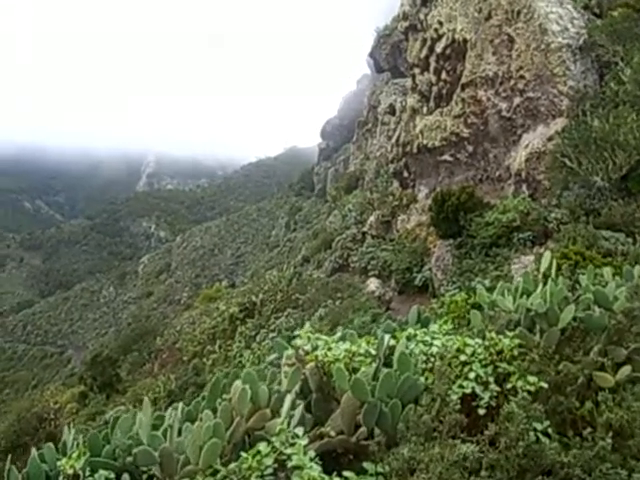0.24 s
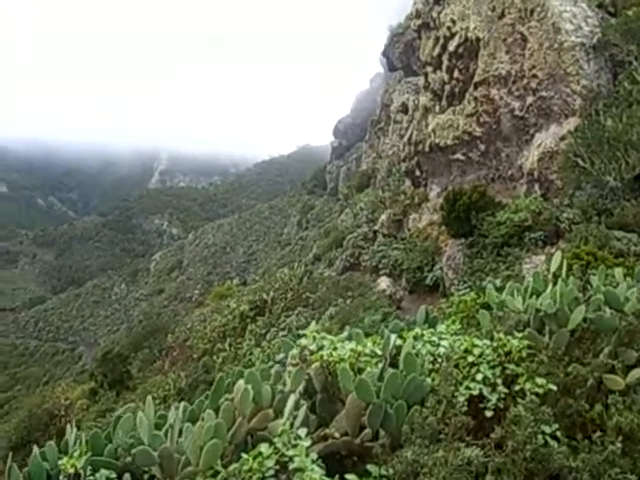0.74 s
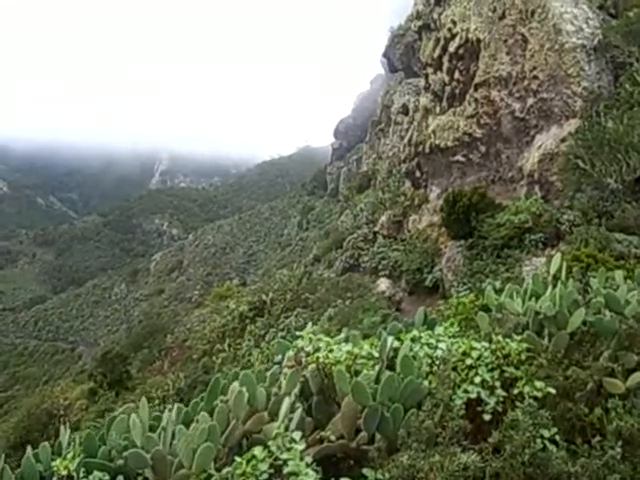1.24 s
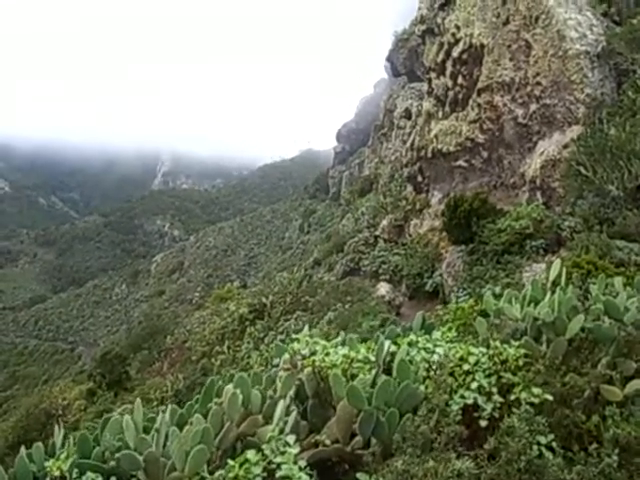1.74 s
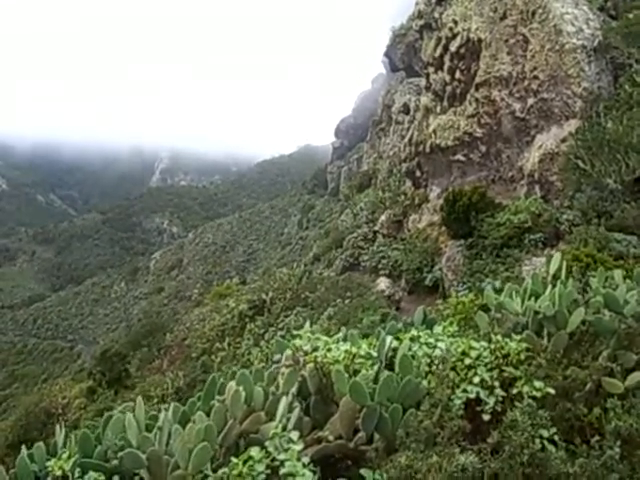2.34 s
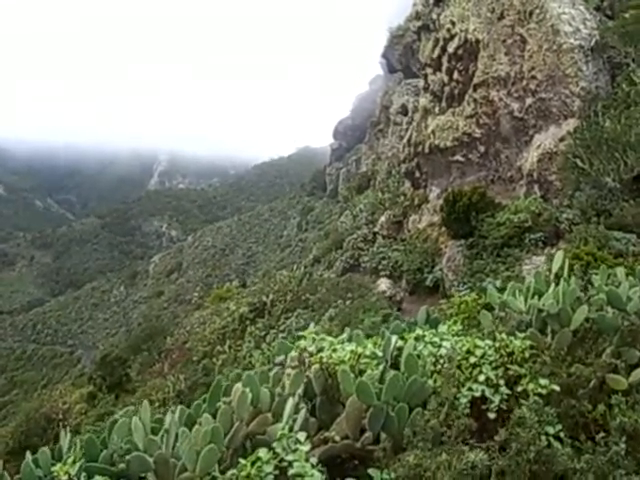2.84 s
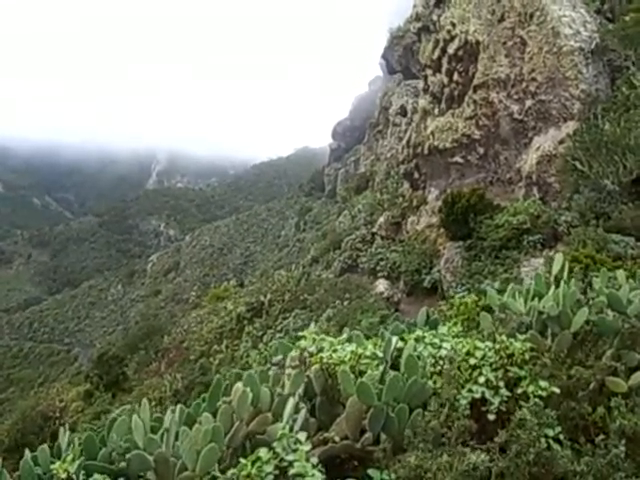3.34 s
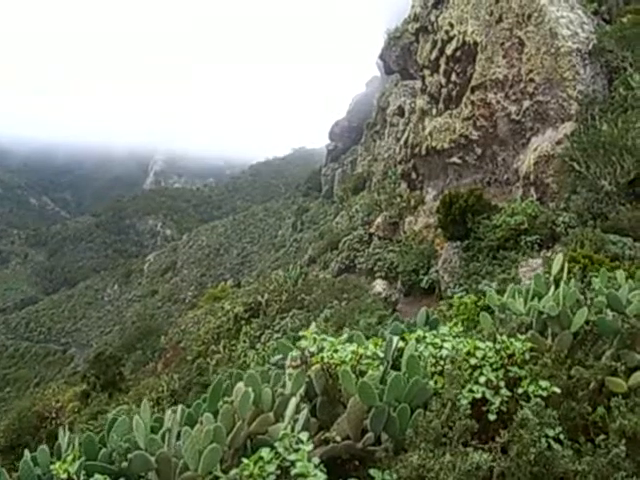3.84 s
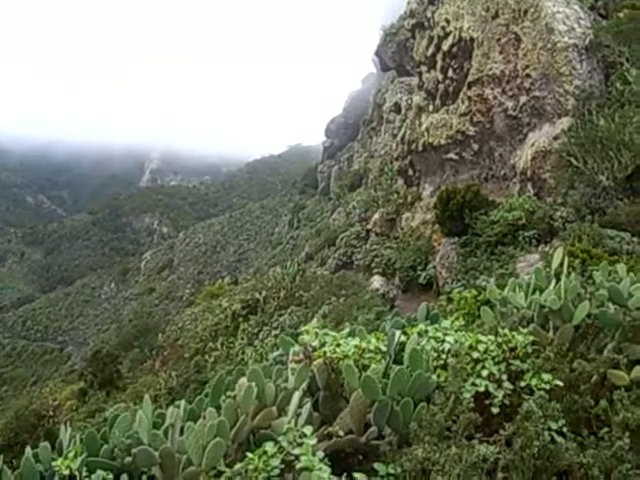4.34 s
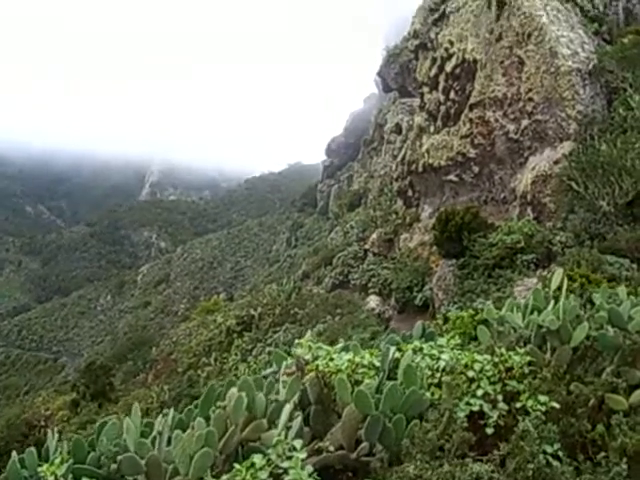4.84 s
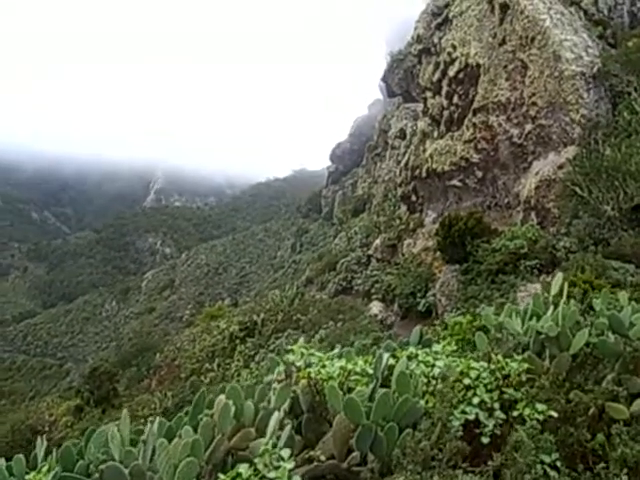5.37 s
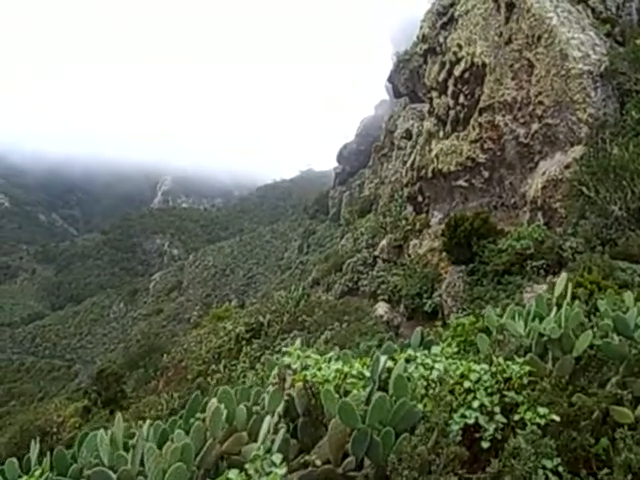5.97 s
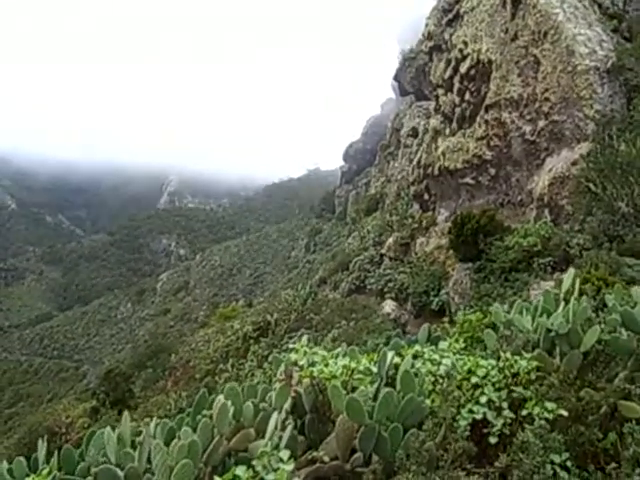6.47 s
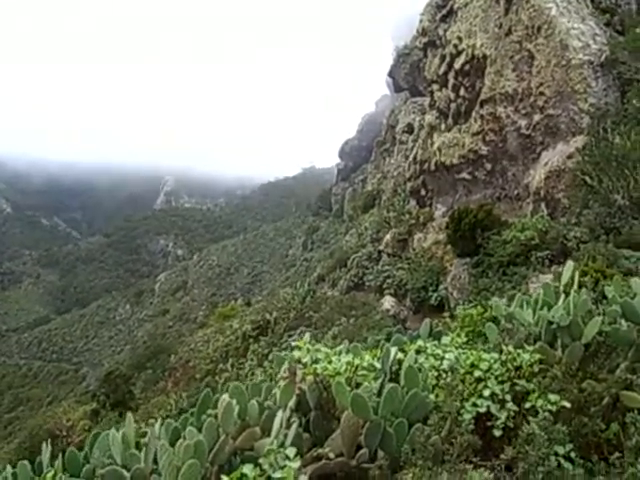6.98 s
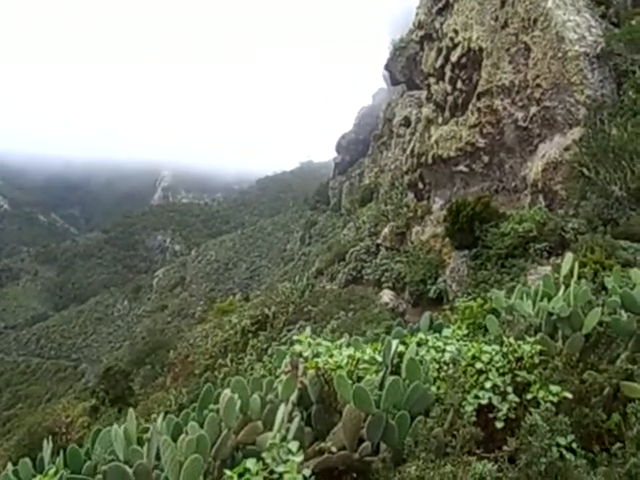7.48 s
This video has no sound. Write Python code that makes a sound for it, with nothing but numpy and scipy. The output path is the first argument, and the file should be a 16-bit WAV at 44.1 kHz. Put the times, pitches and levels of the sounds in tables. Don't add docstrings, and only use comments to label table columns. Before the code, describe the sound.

A steady soft hiss with low rumble, faint hum and very thin high whine runs throughout, as from a small handheld camera outdoors. Barely audible birds twitter far down the slope. At about 1.1 seconds a small near bird begins: three sharp whistles, each about a tenth of a second, sweeping from very high to middling high, the first weaker. From 1.9 to 2.6 it continues with lower, softer warbles, dips and lifts, with short echoes from leaves and rock. Light ticks and strap rustle occur around 2.2. From 3.2 mild wind flutters while distant twitters thicken around 4 to 4.8. Near 5.6 a very thin high note starts the second phrase; a heavy low wind thump hits at 5.75; another high note follows at 5.9, then a lower scoop at 6.1 and four short rising chirps until 6.75. Dull plastic knocks and rustling cluster around 6.8 to 7.0, then faint calls and hiss to the end.

```python
import sys
import numpy as np
from scipy import signal
from scipy.fft import rfft, irfft, next_fast_len
from scipy.io import wavfile
from scipy.ndimage import uniform_filter1d

SR = 44100
rng = np.random.default_rng(int(sys.argv[2]) if len(sys.argv) > 2 else 0)


def to_wav(sig):
    pcm = np.clip(np.atleast_2d(sig), -1, 1) * 32767
    pcm = np.round(pcm).astype(np.int16)
    wavfile.write(sys.argv[1], SR, pcm.T)


def rack_gain(trim_db):
    fader = np.asarray(trim_db, float)
    return 10 ** (fader / 20)


N = 340011
t = np.arange(N) / SR


def birds():
    # [start_s, length_s, low_hz, high_hz, level_db]
    first_fall = (-16, [(0, 1.05, -24), (.14, 1, -12), (.27, .88, -5), (.42, .76, -6), (.57, 0.58, 1.5),
                  (.71, 0.26, -2.5), (.82, .24, 2), (.89, 0.029, -2.5), (1, 0.054, -21)],
                  [(1.136, 0.089, 4750, 7400, -30.5)])
    fall = (-15, [(0, .88, -27), (.09, 0.99, -23), (.19, 0.83, -8.5), (.3, .63, -3.5), (.45, .41, -0.5),
            (.62, .3, -2), (.71, 0, -5), (.93, 0.081, -16.5), (1, 0, -31)], [(1.705, .09, 4730, 7480, -21)])
    long_fall = (-13, [(0, 0.93, -35), (.12, 1.04, -10.5), (.24, .9, -6.5), (.34, .68, -5), (.52, .62, -4),
                 (.63, .42, -1.5), (.72, 0.14, -0.5), (.86, 0.046, -5.5), (1, 0.036, -9)],
                 [(1.471, .103, 4914, 7400, -22.5)])
    under = (0, [(0, 1, -10), (.2, .68, -3), (.33, .42, 2), (.47, .2, -2), (.55, .05, 1), (.66, .3, -3),
             (.78, 0, -5), (.9, .1, -20), (1, 0.36, -22)], [(1.143, 0.051, 5263, 7080, -40.5)])
    long_under = (0, [(0, 0.84, -16), (.15, .85, -2), (.3, .55, -1), (.42, .36, -1), (.55, .36, 2),
                  (.66, .2, -4), (.78, 0, -5), (.9, 0.075, -8), (1, 0.2, -22)],
                  [(1.483, .055, 5330, 7270, -31)])
    warble = (-16, [(0, 1.47, -13.5), (.15, 0.414, 1), (.33, 0.875, -2), (.42, 0.96, -10), (.55, 1.03, 1),
              (.68, 0.46, 4), (.8, 0.18, -15), (.9, 0.1, 4.5), (1, 0.1, -29)],
              [(1.898, 0.079, 3245, 3740, -25.5)])
    warble_end = (-19, [(0, 0.3, -11), (.1, 0.56, 1.5), (.22, 0.065, 2.5), (.33, 0.028, -18), (.5, 0.55, 5),
                  (.6, 0.63, -7), (.8, 1, -1.5), (.9, 0.59, -14), (1, 1, -20)],
                  [(1.979, 0.055, 3164, 3460, -26.5)])
    dip = (-21, [(0, 0.85, -12), (.1, 0.864, -6), (.19, 0.99, 5), (.29, 0.71, -3.5), (.38, 0.17, -5.5),
           (.47, 0.02, -2), (.74, .15, -5), (.93, 0.694, -9), (1, 0.85, -34)],
           [(2.192, 0.13, 2904, 3400, -29)])
    sag = (-32, [(0, 0.85, -3), (.1, 0.766, -1), (.22, 1, 0.5), (.42, 0.35, -2), (.62, .16, -13),
           (.72, 0.084, 0), (.91, 0.019, -1), (1, 0.2, -19)], [(2.484, .111, 2890, 3516, -39.5)])
    lift = (-25, [(0, .2, -24), (.12, 0.04, -6), (.25, 0.3, -13), (.4, 0.52, -7), (.55, 0.96, -1.5),
            (.8, 1, 4), (.92, 0.95, -1), (1, 0.96, -15)], [(2.078, 0.047, 3320, 3529, -25)])
    last_lift = (-17.5, [(0, 0.1, -16), (.2, 0.28, -9), (.32, 0.27, -4), (.55, 0.85, -2), (.68, 1, -0.5),
                 (.86, 0.9, -3.5), (1, 1, -8)], [(2.381, 0.037, 3110, 3716, -33)])
    first_seep = (-11, [(0, 1.75, -19), (.085, 0.76, -2), (.22, .95, -2.5), (.36, 1, -1), (.52, .95, -2),
                  (.7, .75, -5.5), (.82, .62, -13), (.92, 0.14, -13), (1, 0.69, -30)],
                  [(5.622, .106, 7180, 8243, -33)])
    seep = (-16, [(0, 2.2, -19), (.08, 0.94, -5), (.25, 1.084, 3), (.38, 0.93, -3.5), (.52, 0.635, -7.5),
            (.64, 0.65, -27), (.8, .3, -5), (.94, 0.16, -20), (1, .25, -36)],
            [(5.904, 0.1276, 7255, 8175, -25)])
    chip = (-26, [(0, 0, -14), (.25, .7, -1.5), (.45, 0.95, -1.5), (.75, .92, -3), (1, .82, -10)],
            [(6.109, 0.018, 2760, 3930, -38.5)])
    scoop = (-18.5, [(0, 0.68, -25), (.23, 0.055, -24.5), (.28, 0.67, -17), (.38, 0.98, -5.5),
             (.5, 0.767, -7.5), (.6, 0.81, -2.5), (.73, .98, -10.5), (.94, 0.924, -16.5), (1, 0.7, -39)],
             [(6.132, 0.08, 2270, 3275, -18)])
    sweep = (-40, [(0, 0.03, -23), (.1, .3, -15.5), (.22, 0.53, -6.5), (.41, 0.72, -9), (.55, 0.784, -5),
             (.7, 0.93, 0), (.82, .99, 0), (.92, 0.97, -8), (1, 0.97, -23)],
             [(6.279, 0.041, 2560, 4187, -17.5)])
    hook = (-24, [(0, 0.053, -27), (.1, 0.32, -10), (.2, 0.66, -1), (.33, 0.804, -3), (.46, 0.95, -4.5),
            (.65, .98, 1), (.82, 0.99, 0.5), (.92, 0.91, -9), (1, 0.83, -16)],
            [(6.428, 0.037, 2690, 3816, -23), (6.568, 0.0326, 2600, 3801, -25)])
    last_hook = (-26, [(0, 0.13, -23), (.2, 0.45, -2.5), (.35, 0.79, 0), (.55, 1, -1), (.82, 1, 0),
                 (1, 0.65, -16)], [(6.727, 0.0297, 3090, 3626, -28)])
    rock_s, flutter_per_s = 0.018, 62
    voices = (
        (0.0072, 0.0069, (first_fall, fall, long_fall)),
        (0.0072, 0.018, (under, long_under)),
        (0, 0.0035, (warble, warble_end, dip, sag, lift, last_lift, first_seep, seep,
                     chip, scoop, sweep, hook, last_hook)))
    out, shake = np.zeros(N), drift(size=250)
    for flutter, wobble, kinds in voices:
        for rock_db, shape, notes in kinds:
            share, height, effort_db = np.transpose(shape)
            for s, length, low_hz, high_hz, db in notes:
                u = np.linspace(0, 1, round(length * SR))
                hz = low_hz + (high_hz - low_hz) * np.interp(u, share, height)
                hz = uniform_filter1d(hz, 130, mode="nearest")
                hz *= 1 + flutter * np.sin(2 * np.pi * flutter_per_s * length * u)
                hz *= 1 + wobble * shake[round(s * SR):][:len(u)]
                note = whistle(hz, db + np.interp(u, share, effort_db))
                note *= signal.windows.tukey(len(u), 200 / len(u))
                add(out, s, note)
                add(out, s + rock_s, rack_gain(rock_db) * note)
    return hillside(out, shake)


def whistle(hz, db):
    # pitch_hz, level_db
    overtone = [(3500, -71), (4800, -19.5), (6200, -31.5), (7500, -29), (9000, -38)]
    turn = 2 * np.pi * np.cumsum(hz) / SR
    second = rack_gain(np.interp(hz, *np.transpose(overtone))) * np.sin(2 * turn)
    return np.sqrt(2) * rack_gain(db) * (np.sin(turn) + second)


def hillside(x, stir):
    # delay_s, level_db
    leaf_echoes = [
        (.0043, -5.5),
        (.0081, -8),
        (0.012, -14.5),
        (.024, -30.5),
    ]
    # start_s, time_to_peak_s, level_db
    slope_returns = [
        (.006, 0.008, -14.5),
        (0.042, 0.055, -34),
        (.088, .007, -41),
    ]
    # [pitch_hz, level_db]
    cliff_return = (0.072, 0.04, [(2500, -34), (3300, -30.5), (4200, -36), (4900, -32), (5600, -29.5),
                    (6300, -28), (7000, -30), (9000, -38)])
    near, *far = [rack_gain(db) * scattered(s, peak) for s, peak, db in slope_returns]
    near[0] = 1
    for s, db in leaf_echoes:
        add(near, s, rack_gain(db) * np.ones(1))
    s, peak, colour = cliff_return
    cliff_gain = rack_gain(np.interp(np.fft.rfftfreq(SR // 2, 1 / SR), *np.transpose(colour)))
    cliff = irfft(rfft(scattered(s, peak)) * cliff_gain, SR // 2)
    late = signal.fftconvolve(x, cliff + sum(far))[:N]
    late = signal.hilbert(late, next_fast_len(N))[:N]
    stirred = (late * np.exp(1j * 0.7 * stir)).real
    return signal.fftconvolve(x, near)[:N] + stirred


def scattered(s, peak):
    size = SR // 2
    age = np.maximum(np.arange(size) / SR - s, 0)
    tail = (rng.random(size) < .1) * rng.standard_normal(size) * age * np.exp(-age / peak)
    tail *= rack_gain(1.5 * evened(uniform_filter1d(rng.standard_normal(size), 400)))
    return tail / np.linalg.norm(tail)


def twitters():
    # [start_s, length_s, start_hz, end_hz, level_db]
    far_falls = (.6, [(.032, 0.022, 7450, 7000, -66.5), (.195, 0.061, 4330, 3150, -68),
                 (.23, .018, 8400, 8000, -73), (.245, 0.025, 7400, 6750, -69),
                 (.332, .037, 8700, 7900, -75), (.475, 0.036, 8600, 7940, -73), (.91, .03, 5200, 4500, -69),
                 (2.823, 0.04, 3420, 3050, -67), (2.85, .04, 4670, 4400, -65),
                 (4.265, .045, 5950, 5750, -70), (3.83, .04, 6600, 4700, -74),
                 (4.055, 0.033, 5030, 4780, -64), (4.086, 0.036, 4750, 3600, -65),
                 (4.462, 0.028, 5050, 4600, -64), (4.49, 0.032, 4620, 4540, -60.5),
                 (4.533, 0.0207, 3530, 2800, -65), (5.085, 0.025, 3900, 3750, -76),
                 (4.86, .04, 4500, 3700, -70), (5.26, .03, 5000, 3800, -73),
                 (5.515, 0.061, 3140, 3000, -66.5)])
    far_rises = (0.66, [(3.67, 0.074, 5900, 6940, -72), (4.313, 0.022, 5800, 6500, -66),
                 (4.336, 0.028, 6700, 6300, -69), (4.603, 0.022, 4900, 6300, -62.5),
                 (4.59, 0.115, 2200, 3650, -68), (2.66, .04, 4200, 5700, -73),
                 (4.7, 0.046, 3650, 3750, -72), (7.445, .065, 3750, 4380, -65.5)])
    far_late = (.33, [(.793, 0.075, 3610, 3420, -69), (4.54, 0.071, 3600, 5070, -65),
                (4.7, 0.074, 4630, 3430, -63.5), (5.488, 0.034, 3830, 3200, -65),
                (7.213, .058, 5350, 3900, -68), (7.415, .04, 3630, 3850, -68.5),
                (.52, 0.052, 4900, 3900, -74)])
    # start_s,
    # length_s, pitch_hz, level_db
    far_peeps = [(0.722, 0.052, 3580, -67), (1.292, .03, 5570, -64), (1.341, .075, 5500, -65),
                 (7.59, .035, 4130, -74), (2.03, 0.068, 8530, -71), (2.6, .036, 3480, -60.5),
                 (2.625, 0.029, 3390, -64), (2.803, 0.022, 4930, -68), (1.264, .04, 6800, -69.5),
                 (3.245, .03, 4960, -71), (3.864, 0.052, 4480, -63), (4.01, .07, 7300, -76),
                 (4.117, .05, 3580, -74), (4.172, .04, 3450, -77), (4.22, .04, 3430, -70),
                 (4.33, .025, 3400, -71), (4.878, 0.025, 3310, -64), (1.158, .014, 8050, -56.5),
                 (4.798, .012, 3650, -70), (5.288, 0.026, 3330, -66), (5.28, 0.022, 3780, -71),
                 (6.07, 0.04, 3040, -66), (6.89, .04, 7400, -71)]
    # delay_s, level_db
    bounce = (.007, -7)
    # start_s, time_to_peak_s, level_db
    valley = (.004, .02, -10)
    peeps = (.5, [(s, length, hz, hz, db) for s, length, hz, db in far_peeps])
    shake = 1 + .011 * drift(size=250)
    flicker_db = 2.5 * drift(size=300)
    out = np.zeros(N)
    for bend, calls in (far_falls, far_rises, far_late, peeps):
        for s, length, start_hz, end_hz, db in calls:
            u = np.linspace(0, 1, round(length * SR))
            now = slice(round(s * SR), round(s * SR) + len(u))
            glide = u + (2 * bend - 1) * 2 * u * (1 - u)
            hz = (start_hz + (end_hz - start_hz) * glide) * shake[now]
            swell = abs(np.sin(np.pi * u)) ** 0.27
            add(out, s, whistle(hz, db + .4 + flicker_db[now]) * swell)
    blur = rack_gain(valley[2]) * signal.fftconvolve(out, scattered(*valley[:2]))[:N]
    return out + rack_gain(bounce[1]) * np.roll(out, round(bounce[0] * SR)) + blur


def wind():
    # pitch_hz, level_db per Hz
    wind_colour = [(7.1, -28), (12, -6), (23, 9), (38, -3.5), (96, -20.5), (114, -20), (200, -26),
                   (260, -53), (440, -120)]
    # start_s, hold_s, level_db
    gusts = [(3.201, 0.022, -35.5), (3.303, 0.12, -43.5), (3.484, 0.04, -44), (3.604, .02, -46),
             (3.74, 0.018, -35.5), (4.087, 0.17, -42), (4.558, 0.021, -40.5), (5.043, .02, -58),
             (5.523, 0.068, -46), (5.737, 0.015, -25.5), (5.805, 0.1, -22.5), (6.07, 0.076, -36),
             (6.19, 0.22, -42.5), (6.75, 0.015, -37.5), (7.168, 0.032, -47), (7.51, 0.1, -44.5)]
    # time_s, peak_db, half_width_s
    pushes = [(3.219, -38, 0.014), (3.319, -34, 0.007), (3.35, -31.5, 0.0071), (4.208, -38, 0.0054),
              (4.31, -34, 0.0064), (5.731, -23.5, 0.0056), (5.75, -18.5, 0.0036), (5.792, -32, 0.0014),
              (5.809, -24.5, 0.0017), (5.854, -23, 0.0026), (5.878, -25, 0.002), (5.904, -25, 0.0039),
              (6.094, -26.5, 0.0051), (6.153, -38, 0.006), (6.25, -38, 0.0031), (6.768, -33.5, 0.0049),
              (7.185, -45, 0.0067)]
    # time_s, peak_db, half_width_s
    pulls = [
        (3.786, -29, 0.006),
        (4.595, -41.5, 0.0031),
        (5.538, -42.5, 0.0056),
        (5.737, -24, 0.0015),
        (6.125, -34.5, .0046),
        (6.14, -32, 0.0038),
        (6.99, -39.5, 0.0015),
    ]
    build_db_per_s, ebb_db_per_s, calm_db, capsule_hz = 398, 300, -64, 18
    gust = rack_gain(calm_db) * (t > gusts[0][0])
    for s, hold, db in gusts:
        building = build_db_per_s * np.maximum(s - t, 0)
        ebbing = ebb_db_per_s * np.maximum(t - s - hold, 0)
        gust += rack_gain(db - building - ebbing)
    flutter = coloured(wind_colour)
    flutter /= np.sqrt(uniform_filter1d(flutter ** 2, 3000) + 0.067)
    eddies = sum(eddy(*row) for row in pushes) - sum(eddy(*row) for row in pulls)
    vent = signal.butter(1, capsule_hz, "high", fs=SR, output="sos")
    return 1.43 * signal.sosfilt(vent, eddies) + evened(flutter) * gust * rack_gain(-7.5)


def eddy(s, db, half):
    rebound_db, rebound_lag = -10.5, 2.52
    age = (t - s) / half
    swirl = rack_gain(rebound_db) * np.exp(-.7 * (age - rebound_lag) ** 2)
    return rack_gain(db) * (np.exp(-.7 * age ** 2) - swirl)


def handling():
    # time_s, peak_db, centre_hz, t60_s
    ticks = [(2.205, -41, 2500, 0.012), (2.2052, -42, 1400, .012), (2.556, -50, 1100, 0.013),
             (4.837, -44, 200, .03), (4.901, -49.5, 800, .02), (4.931, -47, 450, .025),
             (5.285, -52, 1600, .015), (2.329, -50, 800, 0.03), (4.777, -48.5, 1200, 0.03),
             (5.077, -45, 500, 0.027), (5.985, -43.5, 640, 0.028), (6.029, -47, 807, 0.017),
             (6.037, -44, 600, 0.014), (6.114, -38, 600, 0.011), (6.44, -45.5, 302, 0.1),
             (6.799, -39.5, 896, 0.0065), (6.855, -49, 600, 0.04), (6.883, -33.5, 740, 0.017),
             (6.885, -44, 1280, 0.011), (6.886, -46, 260, .02), (6.895, -48, 900, 0.0089),
             (6.98, -37, 800, 0.023), (6.984, -41, 450, 0.029), (6.984, -40.5, 1500, 0.015),
             (6.985, -49, 2600, .01), (7.002, -56, 700, .02), (7.034, -51, 1190, 0.015)]
    # start_s, length_s, fizz_db, scrape_db
    rustle = [
        (2.169, 0.3, -55.5, -57),
        (2.63, 0.053, -63, -70),
        (4.77, 0.35, -66, -61),
        (6.2, 0.31, -72, -60.5),
        (6.736, 0.12, -62, -57.5),
        (6.825, 0.12, -62.5, -54),
        (6.934, 0.1, -61, -55),
        (7.011, .05, -63, -61),
    ]
    out, age = np.zeros(N), np.arange(SR // 20) / SR
    for s, db, hz, t60 in ticks:
        ring = [(hz / 5, -20), (hz / 2, -5), (hz, 0), (hz * 1.2, -4), (hz * 2.8, -24), (20000, -45)]
        shell = coloured(ring, size=len(age), snap=12)
        add(out, s, rack_gain(db - 1.0 - 60 * age / t60) * shell * np.minimum(age / 0.00075, 1))
    fizz = coloured([(1000, -18), (2500, 2.0), (6000, -1.5), (8000, -9), (10500, 0), (13000, -13), (16000, -16)])
    scrape = coloured([(100, -4), (300, -8.0), (700, -4.5), (1300, -7.5), (3000, -38), (16000, -54)])
    grit = evened(rack_gain(2.7 * drift(size=200)))
    for s, length, fizz_db, scrape_db in rustle:
        rub = grit * (rack_gain(fizz_db) * fizz + rack_gain(scrape_db) * scrape)
        size = round(length * SR)
        add(out, s, rub[round(s * SR):][:size] * np.hanning(size) ** .5)
    return out


def camera():
    # pitch_hz, level_db per Hz
    hiss = [(7.1, -30), (12, 4.5), (38, -1.5), (121, -12), (196, -9), (404, -12), (442, -13), (579, -14),
            (2450, -21.5), (3520, -24), (4470, -26), (12800, -35), (15800, -36)]
    # multiple of the frame rate, level_db
    hum = [(1, -61), (2, -63.5), (3, -67.5), (4, -73.5), (5, -73)]
    # pitch_hz, level_db
    whine = [(15734.26, -73), (15747.3, -77)]
    # pitch_hz, level_db
    readout = [(7882.1, -70), (15674.3, -76)]
    frame_hz, frame_start_s, hiss_db = 29.97, 0.0023, -54
    frame = (t - frame_start_s) * frame_hz
    reading = uniform_filter1d((frame % 1 < .17) * 1., 40)
    out = rack_gain(hiss_db) * coloured(hiss)
    for k, db in hum:
        out += np.sqrt(2) * rack_gain(db) * np.cos(2 * np.pi * round(k) * (frame - .15))
    return out + tones(whine) + reading * tones(readout)


def tones(partials):
    return sum(np.sqrt(2) * rack_gain(db) * np.sin(2 * np.pi * hz * t) for hz, db in partials)


def evened(x):
    return x / np.sqrt(np.mean(x ** 2) + 1e-20)


def add(mix, s, sound):
    part = mix[round(s * SR):][:len(sound)]
    part += sound[:len(part)]


def coloured(points, size=N, snap=0):
    f, db = np.transpose(points)
    hz = np.fft.rfftfreq(size, 1 / SR)
    noise = rng.standard_normal(size) + snap * (np.arange(size) == 50)
    gain = rack_gain(np.interp(np.log(hz + 1), np.log(f + 1), db))
    return evened(irfft(rfft(noise) * gain, size))


def drift(size):
    return evened(uniform_filter1d(rng.standard_normal(N), size))


def scene():
    return (birds() + twitters() + wind() + handling() + camera())[None]


def roll_off(x):
    return signal.sosfilt(signal.butter(12, 16590, fs=SR, output="sos"), x)


def record(dry):
    grain_db, edge_hz = -20.5, 15850
    slope = np.sqrt(uniform_filter1d(np.diff(dry[0], prepend=0) ** 2, 60) + 1e-14)
    grain = coloured([(100, -0.44), (4000, 0.47), (15800, 0.045)])
    grain *= rack_gain(grain_db) * slope * (slope / 0.046) ** 0.015
    band = signal.firwin(2001, edge_hz, window=("kaiser", 9), fs=SR)
    return roll_off(signal.oaconvolve(dry + grain, band[None], "same"))


dry = scene()
out = record(dry)
to_wav(out)
```